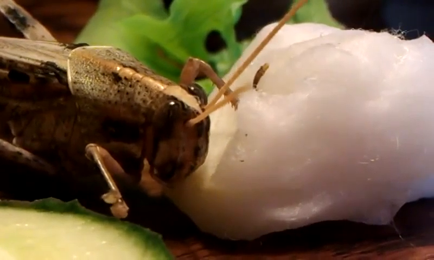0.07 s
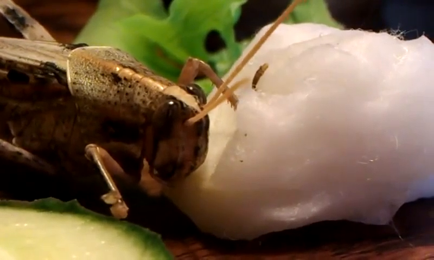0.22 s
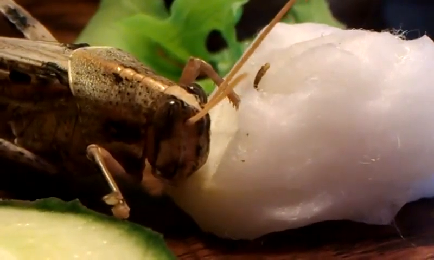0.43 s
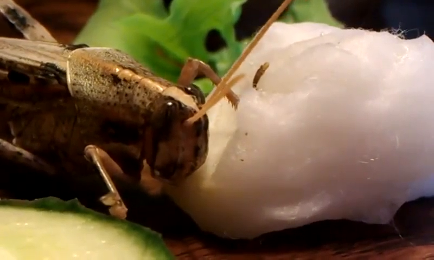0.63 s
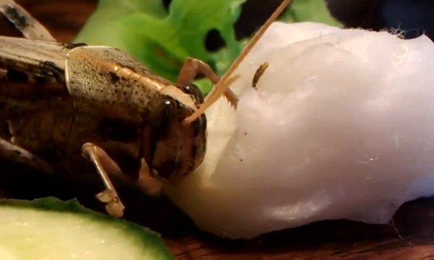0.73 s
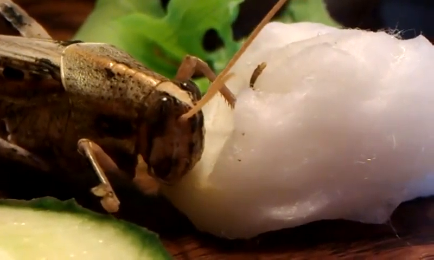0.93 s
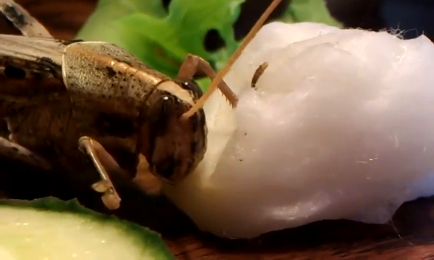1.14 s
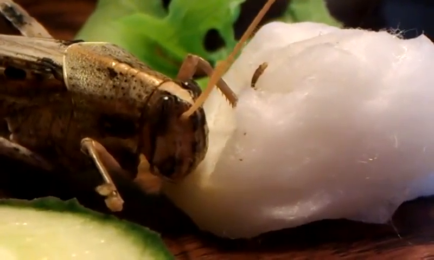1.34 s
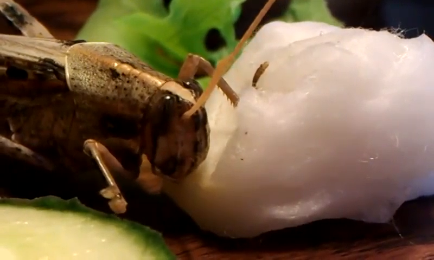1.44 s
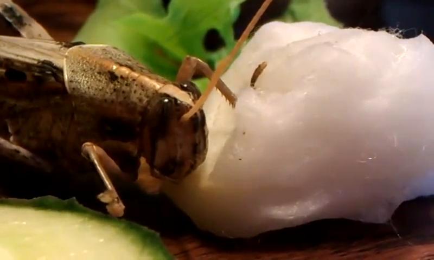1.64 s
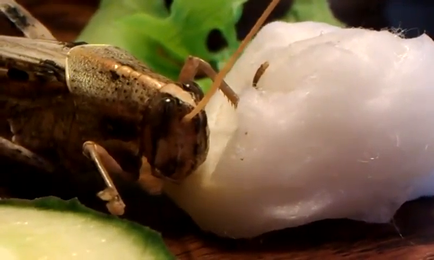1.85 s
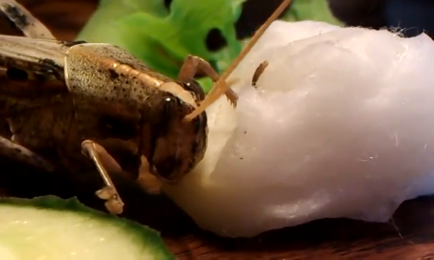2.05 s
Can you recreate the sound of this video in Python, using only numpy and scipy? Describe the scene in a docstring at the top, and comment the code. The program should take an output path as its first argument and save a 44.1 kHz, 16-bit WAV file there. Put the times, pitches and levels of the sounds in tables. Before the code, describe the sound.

A brief, bright bird-like chirp rings indoors, trailed by a faint distant squeak. Close by, a nibbling grasshopper makes soft scrapes and a tiny click, while quiet hiss and low rumble continue underneath.

```python
"""A quiet room rings with one short two-part chirp, like a small bird's: a raspy rising note, its
harmonics shaped by fixed resonances, breaks into a loud, nearly pure high whistle. A faint low squeak
follows. Close by, a feeding grasshopper makes a tiny click with a fainter one just behind it, both
damped oscillations, and some soft rustles of scraping noise. Under it all lie the wavering tones of
a low machine hum, room rumble and microphone hiss."""
import sys
import numpy as np
from scipy import signal
from scipy.fft import rfft, irfft
from scipy.io import wavfile

SR = 44100
rng = np.random.default_rng(int(sys.argv[2]) if len(sys.argv) > 2 else 0)


def unload_wav(signal):
    """Save mono or channel-first audio to the path in sys.argv[1] as 16-bit WAV at rate SR, clipped to [-1, 1]."""
    wavfile.write(
        sys.argv[1],
        SR,
        np.round(np.clip(np.atleast_2d(signal).T, -1, 1) * 32767).astype(np.int16),
    )


N = 92610
T = np.arange(N) / SR

# high whistle: (time [s], pitch [Hz], level [dB])
WHISTLE_GLIDE = [(.151, 6284, -50), (.162, 6400, -40), (.17, 6317, -26.5), (.176, 6427, -29.5),
                 (.181, 6222, -34.5), (.188, 5993, -40), (.193, 6275, -26), (.197, 6020, -26),
                 (.199, 6030, -50)]
# rough burst where the note breaks upward: (frequency [Hz], relative density [dB])
BURST_SPECTRUM = [(3900, -40), (4500, -11), (5000, 5), (5500, 9), (5900, 12.5), (6500, 0), (7300, -11.5),
                  (7900, -17), (10200, -12.5), (11500, -18), (15200, -15), (16500, -28)]
# noisy overtones of the whistle: (frequency [Hz], relative density [dB])
OVERTONE_SPECTRUM = [(8000, -15.5), (9200, -17.5), (10100, -4), (11000, -10.5), (12200, -11), (12900, 8),
                     (13250, 0), (13600, -22), (14500, -15), (15200, -12), (16200, -22)]
# raspy opening note: (time [s], pitch [Hz], level before the resonances [dB])
RASP_GLIDE = [(.059, 2162, -50), (.068, 2163, -54.5), (.072, 2210, -43.5), (.1, 2295, -41),
              (.12, 2424, -46.5), (.129, 2430, -47.5), (.142, 2441, -47), (.162, 2497, -48.5),
              (.172, 2583, -52)]
# its harmonics 1 to 6: (relative level [dB])
RASP_HARMONICS = [-20, 0, -3, -17, -19.5, -17.5]
# its noisy edge: (frequency [Hz], relative density [dB])
EDGE_SPECTRUM = [(3800, -53), (4300, -21), (5000, 11.5), (5500, 0), (6000, 13), (6800, -12), (7400, -21),
                 (7900, -21), (8800, -9), (13000, -12), (15000, -12), (17000, -30)]
# resonances that colour it: (frequency [Hz], gain [dB])
RASP_RESONANCES = [(1900, -20), (2300, 6), (2550, 2), (2900, -28), (3900, -21.5), (4250, 3), (4600, -4),
                   (4880, 7), (5150, -5), (5500, -20), (5900, 0.5), (6500, 0), (6900, 4), (7400, -4.5),
                   (7750, -21.5), (8200, -2), (8700, 3), (10000, 1.5), (13000, 0.5), (14700, 3),
                   (16500, -8)]
# low squeak: (time [s], pitch [Hz], level [dB])
SQUEAK_GLIDE = [(.278, 1219, -58), (.283, 1250, -66.5), (.296, 1292, -61.5), (.31, 1470, -71),
                (.33, 1562, -70), (.37, 1484, -75)]
# the grasshopper's nips: (time [s], ring frequency [Hz], peak level [dB])
NIPS = [(0.8662, 5986, -45.5), (0.8747, 5900, -58.5)]
# swells of rustling: (time [s], half width [s], level [dB])
RUSTLE_SWELLS = [(.715, 0.057, -67), (.955, 0.016, -66), (1.555, 0.0064, -68.5)]
# scraping noise: (frequency [Hz], relative density [dB])
RUSTLE_SPECTRUM = [(4000, -27), (5300, -12.5), (5800, 2), (6200, -3), (6600, -10), (9000, -19),
                   (16000, -29)]
# machine tones: (frequency [Hz], level [dB], waver of amplitude and phase [ratio, rad])
HUM_LINES = [(42, -58.5, 0.11), (114.5, -63.5, 0.24), (227, -80.5, 0.65), (345.4, -76.5, 0.81)]
# envelope of the throbbing tone: (time [s], relative level [dB])
THROB_ENVELOPE = [(0.0, -64), (0.44, -60), (0.48, -74), (0.53, -60), (0.59, -58), (0.68, -67), (0.78, -58),
                  (0.94, -80), (1.13, -52.5), (1.33, -69), (1.41, -58.5), (1.57, -67.5), (1.67, -56.5),
                  (2.1, -67)]
# room rumble: (frequency [Hz], relative density [dB])
RUMBLE_SPECTRUM = [(8, -9), (20, 4.5), (32, 0.5), (55, -8), (80, -6), (105, -3), (130, -6.5), (160, -7),
                   (190, -12.5), (290, -18), (420, -23.5), (800, -40.5)]
# microphone hiss: (frequency [Hz], relative density [dB])
HISS_SPECTRUM = [(100, 0.5), (500, 8), (780, 9.5), (1100, 5.5), (2000, 1.5), (3300, -0.5), (4500, 0),
                 (5300, 3), (5750, 6.5), (6500, 2), (7500, -3.5), (10000, -4.5), (17000, -4.5)]
# reverberation of the room: (frequency [Hz], time to fall 60 dB [s])
REVERB_TIMES = [(500, 0.49), (2400, 0.26), (4800, 0.33), (6300, 0.326), (13000, 0.18), (17000, 0.36)]


def whistle():
    """A gliding sinusoid swells twice, with a noise burst; its overtones come mostly by reflection."""
    phase, level = glide(WHISTLE_GLIDE, jitter=0.013, jitter_hz=500)
    tone = np.sqrt(2) * level * np.sin(phase)
    burst = amp(-38.5) * swell(centre_s=0.1708, width_s=0.0071) * noise(BURST_SPECTRUM)
    overtones = amp(-28.5) * level * noise(OVERTONE_SPECTRUM)
    return room(tone + burst, direct_db=-1.1, wet_db=-3.5) + room(overtones, direct_db=-3.5, wet_db=-0.3)


def rasp():
    """Source and filter: a rough rising harmonic series and noise pass through fixed resonances."""
    phase, level = glide(RASP_GLIDE, jitter=0.0097, jitter_hz=299)
    tone = unit(sum(amp(db) * rough_partial(k * phase, depth=0.91, width_hz=332)
                    for k, db in enumerate(RASP_HARMONICS, start=1)))
    edge = amp(-5.5) * noise(EDGE_SPECTRUM)
    return room(filtered(level * (tone + edge), RASP_RESONANCES), direct_db=-6, wet_db=-6.5)


def squeak():
    """Deep random modulation makes one faint rising partial hoarse, far off in the room."""
    phase, level = glide(SQUEAK_GLIDE, jitter=0.03, jitter_hz=400)
    return room(level * rough_partial(phase, depth=1.9, width_hz=198), direct_db=-2, wet_db=-5)


def clicks():
    """Each nip excites a damped oscillation about a millisecond long, followed by a little crumbling."""
    rise_s, crumble_delay_s, crumble_decay_s = 0.0006, 0.002, 0.0017
    out = np.zeros(N)
    for start, hz, db in NIPS:
        age = np.maximum(T - start, 0) / rise_s
        envelope = (age * np.exp(1 - age)) ** 2
        snap = amp(-14) * rng.standard_normal(N)
        ring = envelope * (np.sin(2 * np.pi * hz * (T - start)) + snap)
        late = T - start - crumble_delay_s
        crumble = (late > 0) * np.exp(-abs(late) / crumble_decay_s) * wander(rate_hz=15500)
        out += amp(db) * (ring + amp(-11.5) * crumble)
    return out


def rustles():
    """Friction noise: fine scraping comes in soft swells with a grainy amplitude."""
    level = sum(amp(db) * swell(centre, width) for centre, width, db in RUSTLE_SWELLS)
    grain_db = 2.0
    return level * noise(RUSTLE_SPECTRUM) * unit(amp(grain_db * wander(rate_hz=150)))


def hum():
    """A machine's line spectrum, each tone slowly modulated in amplitude and phase."""
    out = np.zeros(N)
    for hz, db, waver in HUM_LINES:
        level = 1 + waver * wander(rate_hz=5.5)
        phase = 2 * np.pi * (hz * T + rng.random()) + waver * wander(rate_hz=6.7)
        out += amp(db) * unit(level * np.sin(phase))
    return out


def throb():
    """Slow amplitude modulation makes one more low tone of the hum swell and sink."""
    hz, waver_rad = 77.1, 0.98
    level = amp(np.interp(T, *np.transpose(THROB_ENVELOPE)) - 1)
    return level * np.sqrt(2) * np.sin(2 * np.pi * hz * T + waver_rad * wander(rate_hz=7.2))


def noise_floor():
    """Room rumble and microphone hiss are stationary noises with continuous spectra."""
    return amp(-58.5) * noise(RUMBLE_SPECTRUM) + amp(-66) * noise(HISS_SPECTRUM)


def room(x, direct_db, wet_db):
    """Reverberation: dense reflections follow the direct sound and decay exponentially in each band."""
    build_s = 0.014
    hz, t, bands = signal.stft(rng.standard_normal(SR), SR, nperseg=256)
    decay = amp(-60 * t / value_at(REVERB_TIMES, hz)[:, None])
    tail = signal.istft(bands * decay, SR, nperseg=256)[1]
    tail *= 1 - np.exp(-np.arange(len(tail)) / SR / build_s)
    reflections = signal.fftconvolve(x, tail / np.linalg.norm(tail))[:N]
    return amp(direct_db) * x + amp(wet_db) * reflections


def glide(curve, jitter, jitter_hz):
    """Phase and amplitude of a trembling note; phase is the time integral of frequency."""
    times, hz, db = np.transpose(curve)
    pitch = np.interp(T, times, hz) * (1 + jitter * wander(jitter_hz))
    phase = 2 * np.pi * np.cumsum(pitch) / SR
    gate = np.clip(np.minimum(T - times[0], times[-1] - T) / .002 + 1, 0, 1)  # 2 ms fades
    return phase, gate * amp(np.interp(T, times, db))


def rough_partial(phase, depth, width_hz):
    """Turbulence modulates a partial, and the sidebands spread it into a narrow band."""
    in_phase = (1 + depth * wander(width_hz)) * np.sin(phase)
    quadrature = depth * wander(width_hz) * np.cos(phase)
    return unit(in_phase + quadrature)


def swell(centre_s, width_s):
    """A Gaussian envelope of peak 1."""
    return np.exp(-.5 * ((T - centre_s) / width_s) ** 2)


def wander(rate_hz):
    """Low-pass filtering turns white noise into smooth random motion of rms 1."""
    low_pass = np.exp(-(np.fft.rfftfreq(N, 1 / SR) / rate_hz) ** 2)
    return unit(irfft(rfft(rng.standard_normal(N)) * low_pass, N))


def noise(spectrum):
    """Filtered white noise takes on the filter's spectrum; its rms is set to 1."""
    return unit(filtered(rng.standard_normal(N), spectrum))


def filtered(x, response):
    """A linear filter multiplies the spectrum by its frequency response."""
    return irfft(rfft(x) * amp(value_at(response, np.fft.rfftfreq(N, 1 / SR))), N)


def value_at(table, hz):
    """Interpolation on a logarithmic frequency axis."""
    frequencies, values = np.transpose(table)
    return np.interp(np.log(hz + 1), np.log(frequencies + 1), values)


def amp(db):
    """Decibels to amplitude ratio."""
    return 10 ** (np.asarray(db) / 20)


def unit(x):
    """Normalisation to rms 1."""
    return x / np.sqrt(np.mean(x ** 2) + 1e-20)


def scene():
    """Superposition: the pressures of all sources add at one microphone."""
    return (rasp() + whistle() + squeak() + rustles() + clicks() + throb() + hum() + noise_floor())[None]


def record(dry):
    """A low-pass filter limits the bandwidth."""
    cutoff_hz = 17180
    low_pass = signal.firwin(511, cutoff_hz, window=("kaiser", 9), fs=SR)
    return signal.oaconvolve(dry, low_pass[None], "same")


dry = scene()
out = record(dry)
unload_wav(out)
```